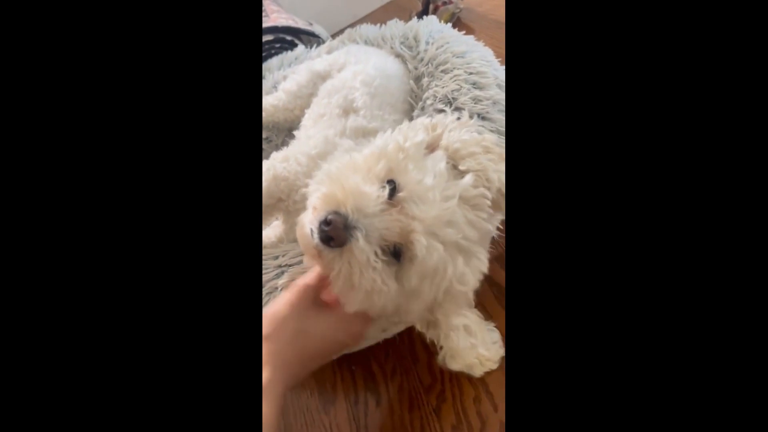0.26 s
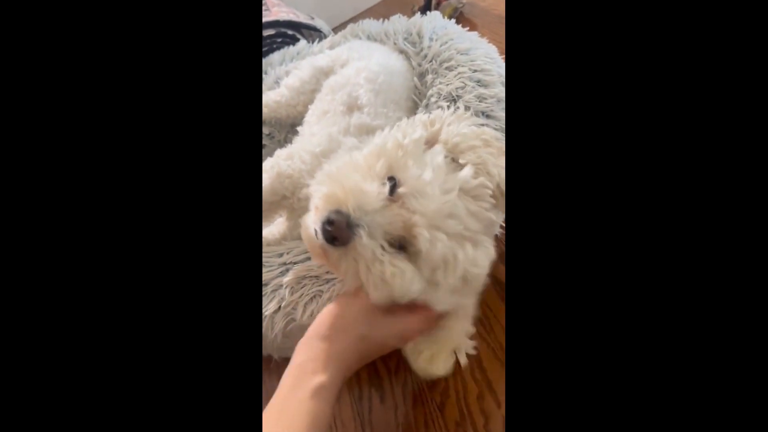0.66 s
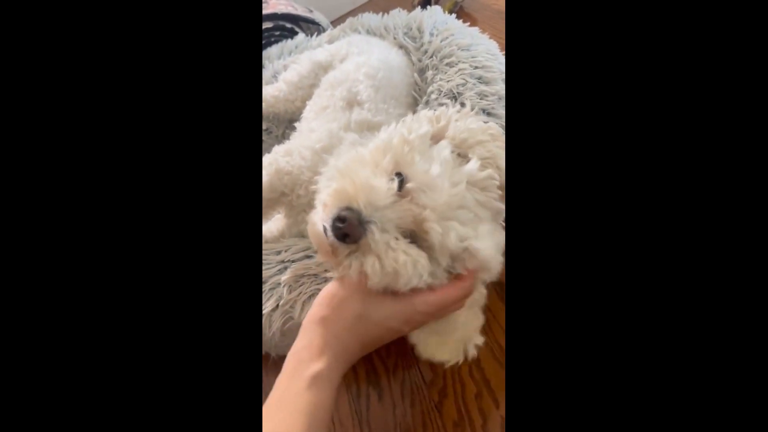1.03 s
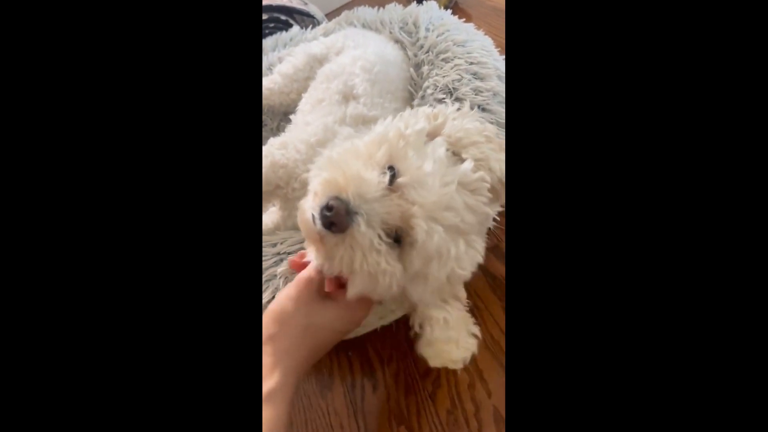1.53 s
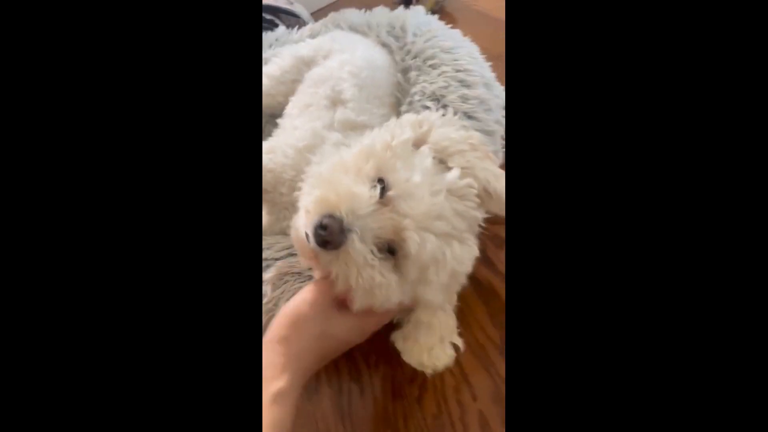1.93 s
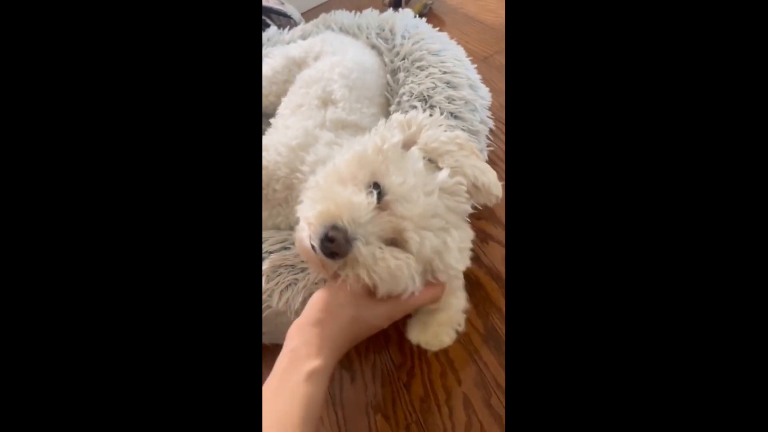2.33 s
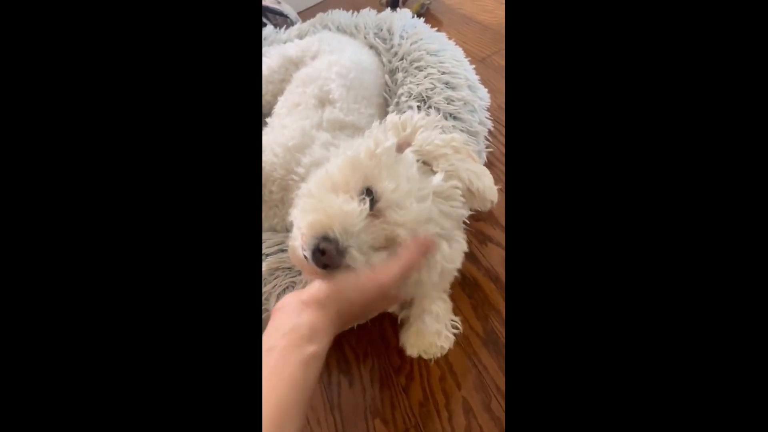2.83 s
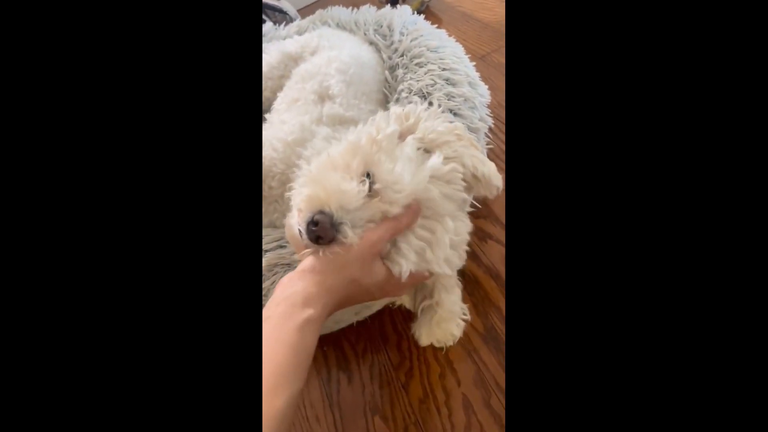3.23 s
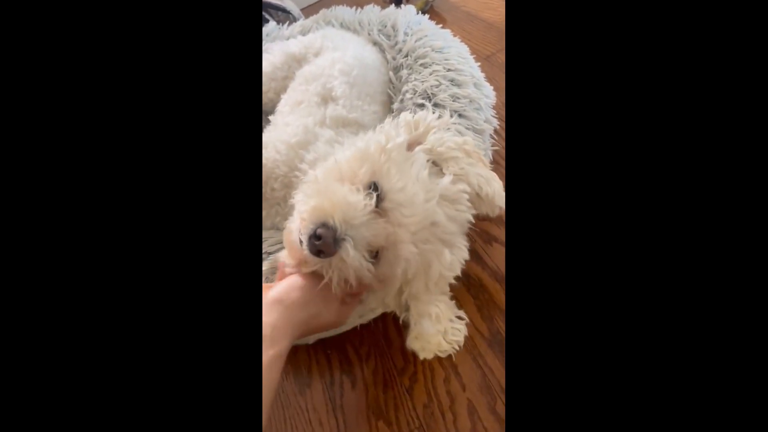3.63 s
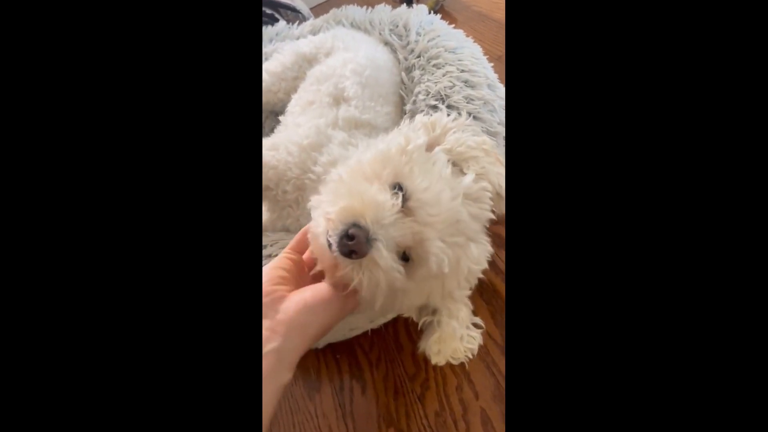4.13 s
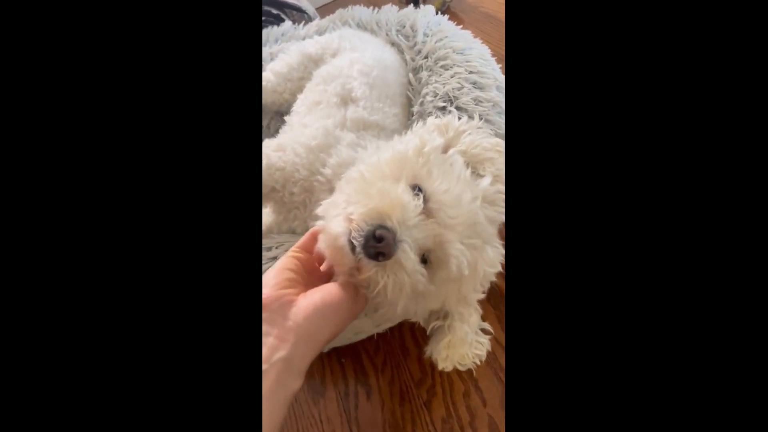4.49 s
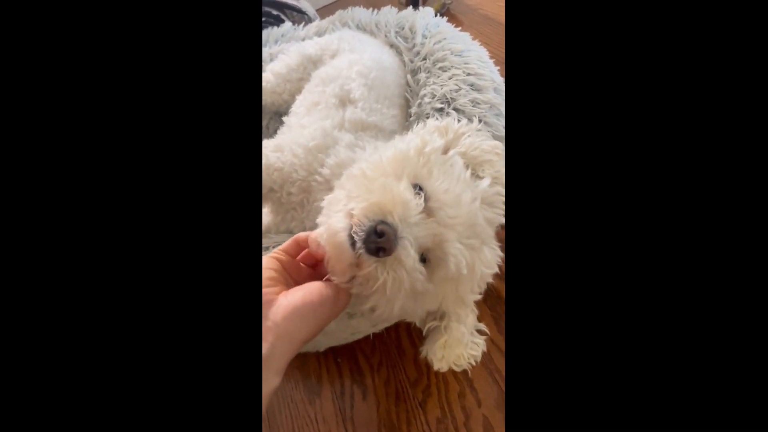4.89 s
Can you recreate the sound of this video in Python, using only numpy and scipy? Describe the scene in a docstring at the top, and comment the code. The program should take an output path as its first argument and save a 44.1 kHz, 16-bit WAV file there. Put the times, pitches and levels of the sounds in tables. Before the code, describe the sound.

A short hard click opens, then fingers scratch a small dog's curly fur close to a phone in a quiet room. Soft, crisp rustles come in uneven strokes, a few each second, with throaty pad drags and small flicks. Low thumps land in the first two seconds and a thin nail tick comes late. Behind are a steady appliance hum, a pulsing engine boom outside and faint hiss.

```python
"""In a quiet room, fingers rub and scratch the woolly fur under a small dog's chin, close to a phone.
Each stroke swells a dense stream of tiny hair-slip clicks over a duller brush of skin; narrower pad drags,
freed tufts, fingertip taps and one nail tick stand out. A short, hard click opens; soft low thumps join in.
Sine tones make the appliance hum, an engine outside that changes speed and a wavering far motor;
filtered noise makes the room's low rumble and the faint hiss."""
import sys
import numpy as np
from scipy import signal
from scipy.fft import rfft, irfft
from scipy.io import wavfile
from scipy.ndimage import map_coordinates

SR = 44100
rng = np.random.default_rng(int(sys.argv[2]) if len(sys.argv) > 2 else 0)


def inscribe(sig):
    """Save sig as 16-bit PCM at rate SR to the path in sys.argv[1].

    A 1-D sig is mono; a 2-D sig holds one channel per row.
    Samples are clipped to [-1, 1] before scaling.
    """
    pcm = np.round(np.clip(np.atleast_2d(sig).T, -1, 1) * 32767)
    wavfile.write(sys.argv[1], SR, pcm.astype(np.int16))


N = 227183
TIME = np.arange(N) / SR
FREQ = np.maximum(np.arange(N // 2 + 1) * SR / N, 1)  # Hz; the floor of 1 avoids log(0)
HALVES = np.array([[.5], [-.5]])  # shares a left-right difference between the channels

# stereo width of the rustle and clicks: freq_hz [Hz], side_minus_mid_db [dB]
FUR_WIDTH = [(500, -1.5), (1050, 5), (1800, -27.5), (2400, -3.5), (3600, 1.5), (5000, 0), (8500, 2.5),
             (9600, -14), (10400, -1), (11200, -2)]


def undb(db):
    """Decibels to gain."""
    return 10 ** (np.asarray(db) / 20)


def unit(x):
    """Scale to an rms of one."""
    return x / np.sqrt(np.mean(x ** 2))


def curves(table):
    """Draw each column of a (time_s, ..) table as a line, sample by sample."""
    time_s, *columns = np.transpose(table)
    return [np.interp(TIME, time_s, column) for column in columns]


def colour(x, points):
    """Equalise by (freq_hz, level_db) points joined along log frequency."""
    hz, db = np.transpose(points)
    gain = undb(np.interp(np.log(FREQ), np.log(hz), db))
    return irfft(rfft(x) * gain, N)


def resonate(x, hz, width_hz):
    """One resonance, gain 1 at its centre."""
    detuning = (FREQ ** 2 - hz ** 2) / (FREQ * width_hz)
    return irfft(rfft(x) / (1 + 1j * detuning), N)


def noise():
    """White noise."""
    return rng.standard_normal(N)


def walk(rate):
    """Smooth random drift that changes about rate times a second; rms 1."""
    lowpass = np.exp(-(FREQ / rate) ** 2)
    return unit(irfft(rfft(noise()) * lowpass, N))


def stereo(mid, side, width):
    """Left and right from two unrelated sounds and a (freq_hz, side_minus_mid_db) width."""
    return mid + colour(side, width) * np.array([[1], [-1]])


def slips(per_s, spread_db):
    """Tiny clicks at random moments, with random signs and sizes; rms 1."""
    size = undb(spread_db * np.minimum(rng.exponential(size=N), 4))
    happens = rng.random(N) < per_s / SR
    return unit(happens * noise() * size)


def rub(hz, width_hz, per_s):
    """Slips pass one resonance twice, which narrows it; two unrelated versions, each rms 1."""
    versions = []
    for _ in range(2):
        clicks = slips(per_s=per_s, spread_db=0.5)
        once = resonate(clicks, hz, width_hz)
        versions.append(unit(resonate(once, hz, width_hz)))
    return np.array(versions)


def swell(middle, length):
    """A level rises, holds briefly and falls again; length runs between the 1/e points."""
    shape = 2.08  # 2 is a bell; more gives a flatter top and steeper flanks
    return np.exp(-abs(2 * (TIME - middle) / length) ** shape)


def bursts(table):
    """Level of sudden releases that die away, from (start_s, peak_db, decay_s) rows."""
    power = np.zeros(N)
    for start, db, decay in table:
        age = np.maximum(TIME - start, 0)
        rise = 1 - np.exp(-age / .0004)  # softens the onset
        power += (undb(db) * rise * np.exp(-age / decay)) ** 2
    return np.sqrt(power)


def strokes():
    """Levels of hair and skin: every stroke adds its swell to the resting contact."""
    # strokes of the hand: middle_s [s], length_s [s], hair_db [dB], skin_db [dB]
    hand_strokes = [(0.0, 0.026, -62, -58.5), (0.024, 0.063, -66.5, -75), (0.1, 0.085, -72, -73),
                    (0.21, 0.12, -78, -78.5), (0.273, 0.079, -70, -79.5), (0.394, 0.1, -78, -85.5),
                    (0.536, 0.1, -77.5, -86), (0.593, 0.15, -71.5, -80), (0.737, 0.057, -79.5, -85),
                    (0.832, 0.04, -79, -78.5), (0.895, 0.13, -68.5, -82.5), (1.006, 0.12, -72.5, -99),
                    (1.24, 0.13, -71, -99), (1.298, 0.23, -75, -97), (1.545, 0.12, -67.5, -76),
                    (1.661, 0.084, -76, -80), (1.857, 0.12, -68, -80), (1.98, 0.086, -78, -83.5),
                    (2.188, 0.13, -71.5, -81), (2.465, .11, -73, -81), (2.546, 0.14, -77.5, -87),
                    (2.665, 0.08, -82, -88), (2.75, 0.12, -78.5, -105), (2.88, 0.078, -86, -92),
                    (3.04, 0.14, -69, -78), (3.208, 0.068, -75, -81), (3.357, 0.1, -71.5, -89),
                    (3.494, 0.093, -77, -82), (3.56, 0.083, -73, -99), (3.652, 0.13, -75, -74.5),
                    (3.796, 0.13, -73, -78), (3.988, 0.17, -79, -81), (4.049, 0.075, -70, -75.5),
                    (4.251, 0.091, -74, -76), (4.359, 0.11, -71, -76), (4.568, 0.14, -78, -85.5),
                    (4.678, 0.076, -74, -77), (4.881, 0.12, -76, -81.5), (4.98, 0.092, -71, -72.5),
                    (5.12, 0.099, -79, -85)]
    # the hand never quite stops or leaves the coat
    hair_rest_db, skin_rest_db = -88, -87
    hair_power, skin_power = undb(hair_rest_db) ** 2, undb(skin_rest_db) ** 2
    for middle, length, hair_db, skin_db in hand_strokes:
        motion = swell(middle, length)
        hair_power = hair_power + (undb(hair_db) * motion) ** 2
        skin_power = skin_power + (undb(skin_db) * motion) ** 2
    return np.sqrt(hair_power), np.sqrt(skin_power)


def palm():
    """A soft low brush, probably the palm: its heel shifts in small uneven steps against the coat."""
    # level before a random flutter: time_s [s], level_db [dB]
    palm_level = [(0, -99), (1.2, -98), (1.55, -88.5), (2.3, -85), (3.05, -85), (3.7, -86.5), (4.15, -91),
                  (4.6, -82), (5.15, -82)]
    db, = curves(palm_level)
    brush = rub(hz=880, width_hz=840, per_s=1200)
    return brush * undb(db + 3.3 * walk(21))


def patchy(pair, depth_db, rate):
    """Each third of an octave swells and fades on its own as different curls pass under the fingers."""
    spectrum, out = rfft(pair), 0
    band = np.clip(3 * np.log2(FREQ / 600), 0, 13)  # the end bands take all below and above
    for k in range(14):
        share = np.maximum(1 - abs(band - k), 0)  # neighbouring bands cross-fade
        out = out + irfft(spectrum * share, N) * undb(depth_db * walk(rate))
    return out


def drags():
    """Finger pads stick and slip on the coat: a narrower, throatier rub."""
    # drags: middle_s [s], length_s [s], level_db [dB], pitch_hz [Hz], width_hz of each filter pass [Hz]
    pad_drags = [(0.0, 0.25, -66.5, 6200, 6000), (0.042, 0.087, -67, 2080, 1900),
                 (0.055, 0.26, -73.5, 1170, 1210), (0.844, 0.014, -79, 830, 596),
                 (0.916, 0.056, -81, 2080, 900), (1.262, 0.12, -81, 2630, 1100),
                 (1.315, 0.047, -79, 775, 300), (1.551, 0.03, -73, 820, 600), (1.553, 0.03, -76, 2547, 800),
                 (1.807, 0.014, -77.5, 800, 500), (1.874, 0.065, -77.5, 2400, 1500),
                 (2.186, 0.071, -89, 4519, 4000), (2.481, 0.1, -86.5, 3997, 4000),
                 (3.058, 0.087, -80, 3750, 2540), (3.32, 0.017, -77, 950, 600),
                 (3.339, 0.14, -77.5, 2640, 900), (3.364, 0.026, -73, 750, 600),
                 (3.67, 0.24, -78, 2400, 2000), (4.037, 0.079, -84, 1790, 2020),
                 (4.27, 0.068, -82, 2297, 2199), (4.349, 0.075, -74, 2072, 1420),
                 (4.35, 0.081, -78.5, 5200, 3000), (4.668, 0.059, -79.5, 4530, 5460),
                 (4.98, 0.095, -79, 5664, 2820), (4.976, 0.75, -80.5, 1060, 1101)]
    out = np.zeros((2, N))
    for middle, length, db, hz, width in pad_drags:
        out += rub(hz, width, per_s=2300) * undb(db) * swell(middle, length)
    return out


def mirrored(pair):
    """Near surfaces add short echoes; their comb of peaks and notches shifts as the hand moves."""
    # the floor and the forearm as mirrors: mean lag_s [s], gain_db relative to the direct sound [dB]
    mirrors = [(.0017, -11), (.0034, -8.5)]
    sway, sway_rate = .08, 3  # rms share of the lag, changes per second
    out, power = pair, 1
    for lag, db in mirrors:
        late = (TIME - lag * (1 + sway * walk(sway_rate))) * SR
        out = out + undb(db) * np.array([map_coordinates(x, [late]) for x in pair])
        power += undb(db) ** 2
    return out / np.sqrt(power)


def from_muzzle(pair):
    """Colour, width and phase between the ports for a sound beside the muzzle, mostly left port first."""
    # path to the ports: freq_hz [Hz], gain_db [dB], side_minus_mid_db [dB], left_lead_rad [rad]
    muzzle_path = [(500, -1, 2, -1), (1130, -1, 2, 0.5), (1620, -0.5, -24, -1), (2600, 1, -12, 0.9),
                   (4000, 2.5, -4.5, 1.6), (5000, 3, -3, 2), (7100, 0.5, -1.5, 2), (8700, 5, -3.5, 3.5),
                   (9100, 6, -12, 3.15), (9850, 4.5, -10, 3.5), (10400, 2.5, -2, 4.5),
                   (11200, 5.5, -5, 5.5), (11500, 1.5, 5, 11.5)]
    hz, db, side_db, lead = np.transpose(muzzle_path)
    ports = stereo(*pair, np.transpose([hz, side_db]))
    gain = undb(np.interp(FREQ, hz, db))
    turn = np.interp(FREQ, hz, lead) * HALVES
    return irfft(rfft(ports) * gain * np.exp(1j * turn), N)


def fur():
    """Hairs slip past the fingers, thicker in fast strokes; skin brushes over the coat beneath."""
    # colour of slipping hairs: freq_hz [Hz], relative level_db [dB per Hz]
    hair_colour = [(500, -45.5), (1500, -20), (2700, -15.5), (3700, -12.5), (4800, -17.5), (6500, -9),
                   (8300, -6), (9200, -6), (9750, 4.5), (10400, 2.5), (10900, -5), (11800, -22.5)]
    # colour of skin on the coat: freq_hz [Hz], relative level_db [dB per Hz]
    skin_colour = [(300, -11.5), (700, 7.5), (1100, 2.5), (1800, 0.5), (2550, 5), (3400, -4.5),
                   (4800, -7.5), (7000, -4), (12000, -17.5)]
    # tufts that catch on a finger and flick free: start_s [s], peak_db [dB], decay_s [s]
    snags = [(0.263, -73, 0.015), (0.624, -69, 0.0087), (0.893, -70, 0.017), (1.545, -74, 0.013),
             (1.655, -80, 0.0079), (2.473, -69, 0.0067), (3.334, -67, 0.019), (3.804, -64, 0.013),
             (4.963, -66.5, 0.028)]
    # fingertips touch down: start_s [s], peak_db [dB], decay_s [s]
    taps = [(1.653, -66.5, 0.0035), (3.466, -76, .003), (3.768, -72, 0.0015)]
    turn_s, turn_length_s = 3.1, 0.15  # the fingers move from under the cheek to beside the muzzle

    hair_level, skin_level = strokes()
    speed = np.sqrt(hair_level / hair_level.max())
    hair_rate, skin_rate = 3500 + 11000 * speed, 1200 + 4000 * speed  # slips per second
    hair = np.array([unit(colour(slips(hair_rate, spread_db=-1.0), hair_colour)) for _ in range(2)])
    skin = np.array([unit(colour(slips(skin_rate, spread_db=0.0), skin_colour)) for _ in range(2)])
    hair = hair * np.hypot(hair_level, bursts(snags))  # a freed tuft lets many hairs go at once
    skin = skin * np.hypot(skin_level, bursts(taps))

    # the coat is curly, so the drag is uneven
    contact = patchy(hair + skin + palm(), depth_db=2.5, rate=20.3)
    rustle = mirrored(contact + drags())
    place = np.clip((TIME - turn_s) / turn_length_s, 0, 1)  # 0 under the cheek, 1 beside the muzzle
    cheek = stereo(*(rustle * np.sqrt(1 - place)), FUR_WIDTH)
    return cheek + from_muzzle(rustle * np.sqrt(place))


def opening_click():
    """A short, hard click at the very start: a burst of dense noise through several resonances."""
    # the click's one burst: start_s [s], peak_db [dB], decay_s [s]
    click_burst = (0.0024, -45, 0.0036)
    # resonances of the click: pitch_hz [Hz], width_hz of each filter pass [Hz], relative level_db [dB]
    modes = [(2550, 310, 0), (4000, 900, -0.5), (5500, 200, -7), (6840, 670, -2), (8530, 490, -8)]
    ringing = sum(undb(db) * rub(hz, width, per_s=26000) for hz, width, db in modes)
    return stereo(*unit(ringing), FUR_WIDTH) * bursts([click_burst])


def engine():
    """An engine outside: walls pass only the lowest firing tone, a sine that follows its speed."""
    # speed of the engine: time_s [s], firing_rate_hz [Hz]
    speed = [(0, 83.4), (.25, 80.5), (.76, 76.94), (1.0, 70), (1.3, 73.84), (2.1, 74.76), (2.7, 73.06),
             (3.3, 73.3), (4.0, 72.28), (4.35, 72.5), (4.52, 58.6), (4.7, 48.62), (5.15, 48)]
    # level of the boom before a random flutter: time_s [s], level_db [dB]
    boom_level = [(0, -49), (.25, -43.5), (.46, -52), (.54, -44.5), (.68, -54), (.76, -50), (.85, -60.5),
                  (1.0, -66.5), (1.18, -70), (1.45, -64), (1.52, -48.5), (1.78, -70), (2.12, -60.5),
                  (2.17, -52.5), (2.62, -49.5), (2.74, -56), (2.86, -47.5), (2.94, -54.5), (3.03, -46.5),
                  (3.14, -48.5), (3.26, -41), (3.33, -49.5), (3.42, -43.5), (3.51, -61), (3.83, -67),
                  (3.86, -46.5), (3.96, -54.5), (4.06, -45.5), (4.35, -49.5), (4.47, -56.5), (5.15, -59.5)]
    hz, = curves(speed)
    boom_db, = curves(boom_level)
    wobble = .12 * walk(12)  # rad
    phase = 2 * np.pi * np.cumsum(hz) / SR + wobble
    return unit(np.sin(phase)) * undb(boom_db + .6 * walk(13))


def drone():
    """A far motor: a weak fundamental under a wavering second harmonic that swells and drops out."""
    # pitch of the second harmonic before its waver: time_s [s], pitch_hz [Hz]
    pitch = [(0, 137.7), (.9, 142.4), (1.5, 147.6), (2.2, 150.1), (2.7, 149), (3.3, 146.8), (3.9, 144.1),
             (5.15, 141.9)]
    # level of the second harmonic before its flutter: time_s [s], level_db [dB]
    level = [(0, -69), (.4, -71.5), (.86, -64.5), (1.0, -78), (1.55, -65), (1.78, -70), (1.9, -62),
             (2.03, -70.5), (2.18, -56), (2.34, -69), (2.55, -58), (2.68, -66.5), (2.81, -58.5),
             (2.98, -72), (3.1, -62), (3.43, -59), (3.54, -86), (3.65, -59), (4.05, -67.5), (4.3, -58.5),
             (4.44, -69), (4.72, -66.5), (4.92, -60), (5.15, -67)]
    waver_hz, flutter_db, fundamental_db = 2.2, 2, -65
    hz, = curves(pitch)
    db, = curves(level)
    phase = 2 * np.pi * np.cumsum(hz + waver_hz * walk(5.5)) / SR
    harmonic = unit(np.sin(phase)) * undb(db + flutter_db * walk(14))
    fundamental = unit(np.sin(phase / 2)) * undb(fundamental_db)
    return harmonic + fundamental


def appliance():
    """Steady motor tones; standing waves give each its own place between the ears."""
    # hum tones: pitch_hz [Hz], level_db [dB rms], left_minus_right_db [dB], left_lead_rad [rad]
    hum = [(119.9, -68.5, 2, 0.13), (296.7, -70, 7.5, 0.13), (452.6, -83, -2, 0.14),
           (481.5, -86.5, -6, 0.9), (507.3, -74.5, 5, 0.77), (1186, -99, -4, 1.4)]
    out = np.zeros((2, N))
    for hz, db, pan_db, lead in hum:
        phase = 2 * np.pi * (hz * TIME + rng.random()) + 0.16 * walk(9.1)
        level = undb(db + HALVES * pan_db + 0.45 * walk(5.1))
        out += np.sqrt(2) * level * np.sin(phase + HALVES * lead)  # sqrt(2) turns rms into peak
    return out


def room():
    """Low rumble of the house, its depths nearly alike in both ears, under a faint microphone hiss."""
    # colour of the room air: freq_hz [Hz], relative level_db [dB per Hz]
    air_colour = [(15, -32), (28, -15), (42, -0.5), (56, 2), (80, -3), (110, -4), (170, -11.5),
                  (240, -15.5), (330, -20), (470, -24), (620, -36), (1200, -44), (3000, -47.5), (5200, -56)]
    # stereo width of the room air: freq_hz [Hz], side_minus_mid_db [dB]
    air_width = [(60, -29), (125, -18.5), (250, -7), (500, 1), (1000, 6), (4000, -19.5)]
    # level of the low rumble: time_s [s], level_db [dB]
    air_level = [(0, -58), (.9, -59), (1.15, -58.5), (1.6, -56.5), (2.2, -57), (3.3, -56), (3.6, -56),
                 (4.4, -57.5), (5.15, -56.5)]
    # colour of the microphone hiss: freq_hz [Hz], relative level_db [dB per Hz]
    hiss_colour = [(2000, -12), (5000, -23), (8500, -2.5), (10200, -8.5), (11800, -2.5)]
    hiss_db = -89
    air = stereo(*[unit(colour(noise(), air_colour)) for _ in range(2)], air_width)
    hiss = np.array([unit(colour(noise(), hiss_colour)) for _ in range(2)])
    air_db, = curves(air_level)
    return undb(air_db) * air + undb(hiss_db) * hiss


def bumps():
    """Soft low thumps of a few slow cycles, probably the hand bumping."""
    # thumps: middle_s [s], length_s [s], level_db [dB], pitch_hz [Hz]
    low_bumps = [(0.931, 0.035, -52, 67.6), (0.997, 0.025, -49, 58), (1.332, 0.02, -48.5, 66),
                 (1.397, 0.028, -55, 68.5), (1.687, 0.02, -54, 71.7), (1.929, 0.04, -52, 73.6)]
    out = np.zeros(N)
    for middle, length, db, hz in low_bumps:
        cycles = np.cos(2 * np.pi * hz * (TIME - middle))
        out += np.sqrt(2) * undb(db) * swell(middle, length) * cycles
    return out


def nail():
    """The edge of a nail snaps past a hair once: a thin, bright tick."""
    start_s, peak_db, decay_s = 3.7675, -56, .003
    tick = stereo(*rub(hz=10000, width_hz=4600, per_s=25000), FUR_WIDTH)
    return tick * bursts([(start_s, peak_db, decay_s)])


def scene():
    """The rubbing, clicks and thumps in front; the engine, drone, hum and room behind."""
    front = fur() + opening_click() + nail() + bumps()
    return front + engine() + drone() + appliance() + room()


def record(dry):
    """The phone cuts the top: a steep low-pass."""
    top_hz = 12000
    lowpass = signal.ellip(10, .2, 60, top_hz, fs=SR, output="sos")  # .2 dB ripple, 60 dB stop
    return signal.sosfilt(lowpass, dry)


dry = scene()
out = record(dry)
inscribe(out)
```